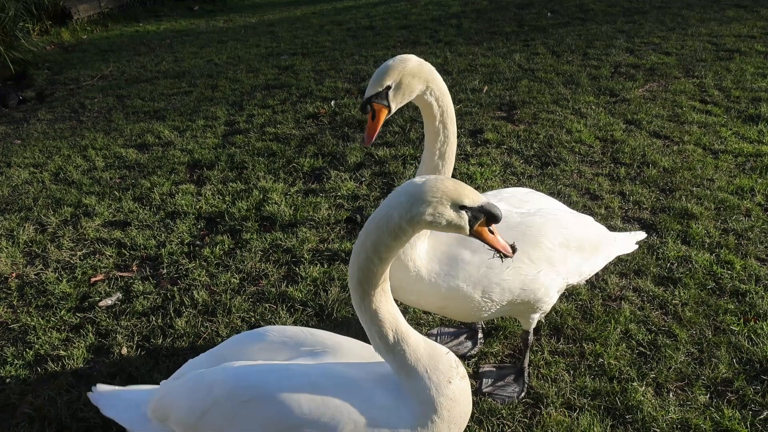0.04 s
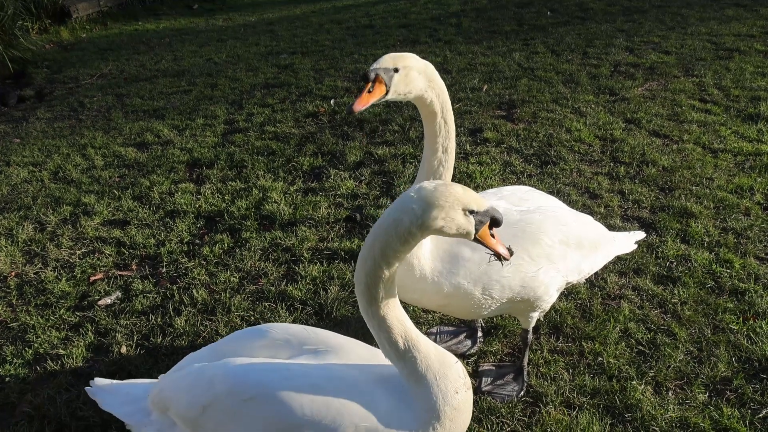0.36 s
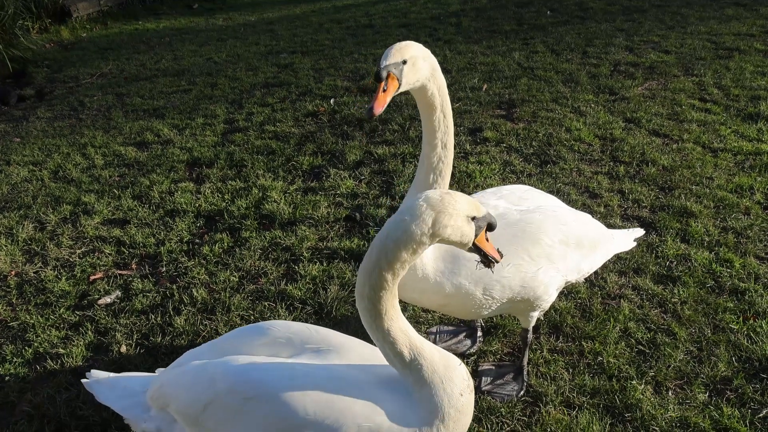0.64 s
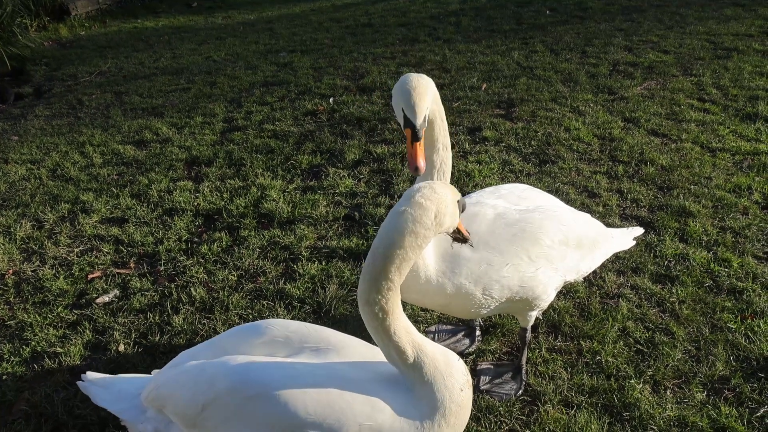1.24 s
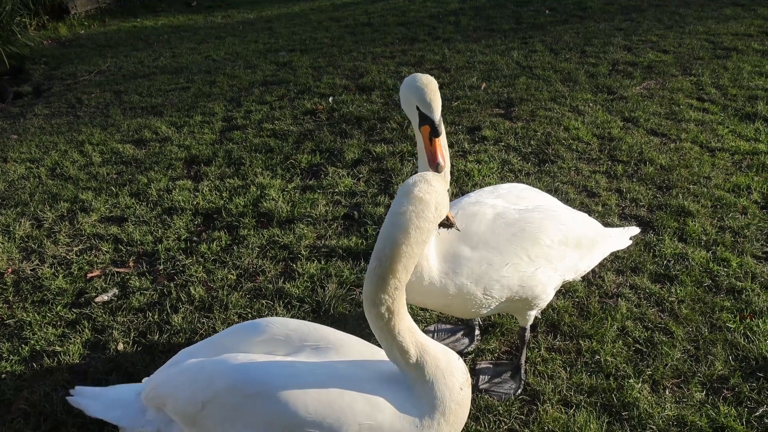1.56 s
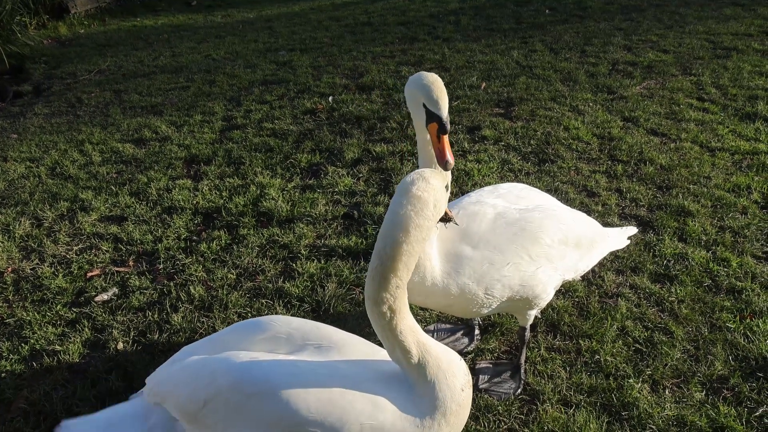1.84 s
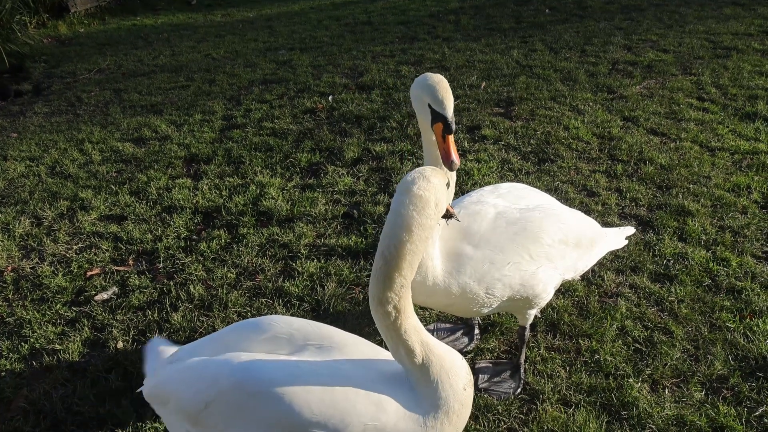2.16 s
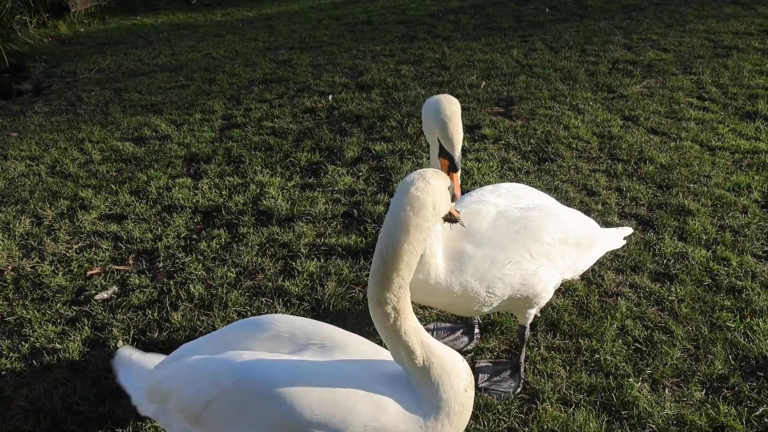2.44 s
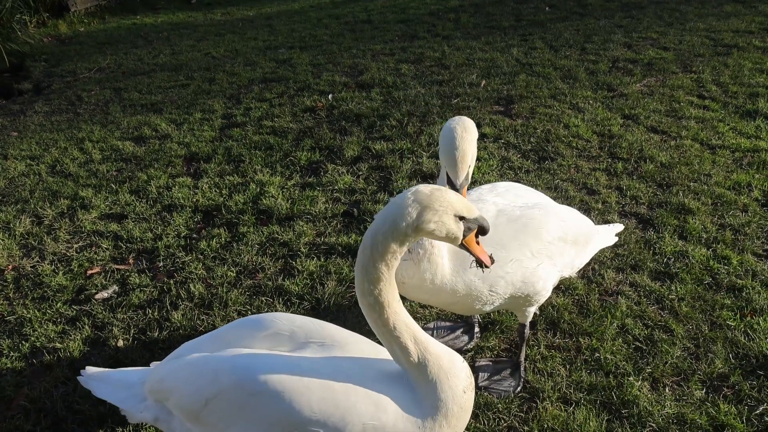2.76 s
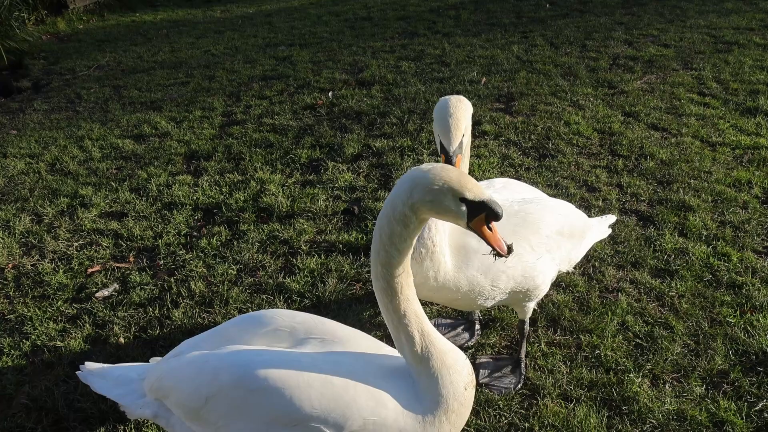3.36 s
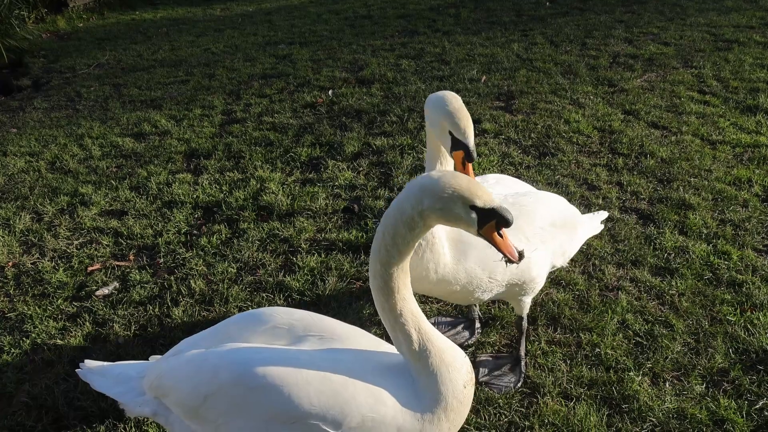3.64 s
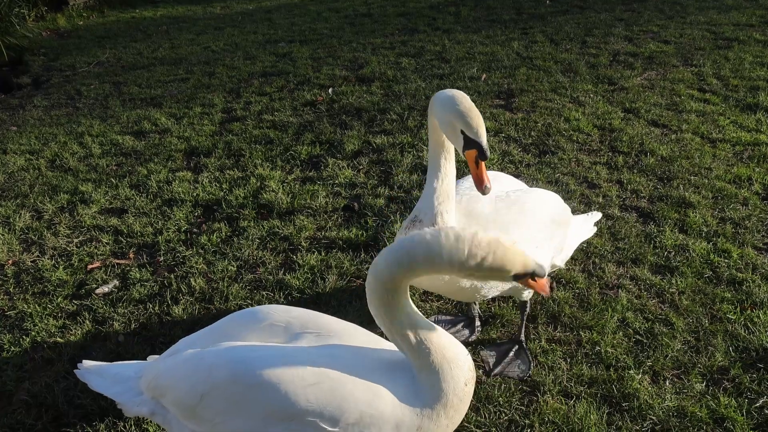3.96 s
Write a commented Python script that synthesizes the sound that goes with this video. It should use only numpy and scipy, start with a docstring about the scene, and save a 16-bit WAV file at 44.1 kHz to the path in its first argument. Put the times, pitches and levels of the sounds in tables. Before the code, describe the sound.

A swan hisses close by at 0.2 seconds, gives a sharp double snort near 0.4, and hisses again at 0.6, with a fine wet nostril rattle. Five rough, high whistles, each rising and falling, come between 1.2 and 1.9 seconds. Faint breaths follow, with soft peeps around 3.2 to 3.6. Small ticks dot the grass. Distant traffic rumbles throughout, and light wind bumps the microphone, mostly after 2 seconds.

```python
"""On a lawn, two swans close to the microphone. One forces air through its bill in a hiss, snorts twice
with slaps of the throat, hisses again with a fine wet rattle in the nostrils, then gives five rough,
arching whistles from both sides of the syrinx. Fainter peeps follow; bills and feet tick in the grass.
Traffic rumbles in the distance and a light wind bumps the microphone."""
import sys
import numpy as np
from scipy import signal
from scipy.fft import rfft, irfft
from scipy.io import wavfile
from scipy.ndimage import uniform_filter1d

SR = 44100
rng = np.random.default_rng(int(sys.argv[2]) if len(sys.argv) > 2 else 0)


def dump(signal):
    """Clip the signal to [-1, 1] and save it as 16-bit WAV at the path in sys.argv[1]."""
    limited = np.clip(np.atleast_2d(signal).T, -1, 1)
    pcm = np.round(limited * 32767).astype(np.int16)
    wavfile.write(sys.argv[1], SR, pcm)


N = 176400

# The pitch arch of every whistle: length_share, top_pitch_share
PITCH_ARCH = [(0, .53), (.08, .72), (.22, .79), (.34, .92), (.5, 1), (.66, .98), (.81, .8), (1, .53)]
# Whistles close to the microphone: start_s, length_s, top_pitch_hz, level_db, overtones_db, roughness
WHISTLE_CALLS = [(1.212, 0.075, 2610, -37.5, -9, 0.53), (1.327, 0.12, 2885, -31, -8, .55),
                 (1.479, 0.12, 2970, -26.5, -17, 0.54), (1.649, .115, 2960, -30.5, -15, 0.56),
                 (1.807, 0.12, 2762, -30.5, -16, 0.62)]


def whistles(attack_s=0.013, release_s=0.015, fade_db=9.5, stutter_hz=72, stutter_db=8):
    """Each call stutters as it climbs and fades as it falls; the two sides of the syrinx beat together."""
    second_ratio, second_db = 1.07, -1.5   # the other side of the syrinx, a little higher
    out = np.zeros(N)
    for start, length, top_hz, db, overtones_db, roughness in WHISTLE_CALLS:
        t = seconds(length)
        progress = t / length
        arch = np.interp(progress, *np.transpose(PITCH_ARCH))
        pitch = top_hz * uniform_filter1d(arch, size=400, mode="nearest")
        climb_left = np.maximum(1 - 2 * progress, 0)
        fallen = np.maximum(2 * progress - 1, 0)
        gate = np.minimum(t / attack_s, 1) * np.minimum((length - t) / release_s, 1)
        stutter = climb_left * np.cos(2 * np.pi * stutter_hz * t)
        level = gate * from_db(db - fade_db * fallen - stutter_db * stutter)
        rasp = roughness * (1 + 1.32 * np.sin(np.pi * climb_left))   # rougher on the way up
        second_level = from_db(second_db) * np.sin(np.pi * progress)
        second_side = second_level * syrinx(second_ratio * pitch, overtones_db, rasp)
        add(out, start, level * (syrinx(pitch, overtones_db, rasp) + second_side))
    return out


# How the throat colours whistles and squeaks: frequency_hz, gain_db
THROAT_COLOUR = [(1400, 36), (1750, 2.5), (2100, -7), (2550, -4.5), (2950, -2), (3500, -9.5), (4700, 2),
                 (5600, -2.5), (7000, -9.5), (9000, -14.5), (12000, -28)]


def syrinx(pitch, overtones_db, roughness, rasp_hz=220, rasp_width_hz=265, overtone_step_db=-6.5):
    """A tone and three overtones, wavering slowly and shaken in pitch and level by a fast rasp."""
    size = len(pitch)
    shake, throb = (band_noise(rasp_hz, rasp_width_hz, size=8192)[:size] for _ in range(2))
    waver = band_noise(hz=45, width_hz=45, size=8192)[:size]
    shaken_pitch = pitch * (1 + 0.039 * roughness * shake + 0.009 * waver)
    phase = 2 * np.pi * np.cumsum(shaken_pitch) / SR
    tone = 0
    for k in range(1, 5):
        db = 0 if k == 1 else overtones_db + overtone_step_db * (k - 2)
        tone = tone + from_db(db + at_hz(THROAT_COLOUR, k * pitch)) * np.sin(k * phase)
    return np.sqrt(2) * tone * rms_one(1 + 0.29 * roughness * throb)


# Close squeaks and fainter peeps: start_s, length_s, pitch_hz, level_db, overtones_db
SQUEAK_NOTES = [(1.188, 0.0048, 2370, -28, -11), (1.202, 0.0068, 2320, -20.5, -15),
                (1.215, 0.0114, 2316, -25, -11), (1.225, 0.013, 2340, -28, -13),
                (1.33, 0.011, 1950, -33, -10), (1.437, 0.0072, 1726, -35, -15),
                (1.651, .009, 1970, -33, -18), (1.918, .016, 1784, -33.5, -13),
                (3.242, .04, 2200, -39.5, -13.5), (3.482, 0.033, 3820, -39.5, -12),
                (3.519, 0.021, 3890, -36, -28), (3.533, 0.033, 4000, -42, -25),
                (3.533, 0.053, 2950, -39.5, -22)]


def squeaks():
    """Very short notes of the syrinx: a stutter into the whistles, catches at their edges, later peeps."""
    out = np.zeros(N)
    for start, length, hz, db, overtones_db in SQUEAK_NOTES:
        arch = np.sin(np.pi * seconds(length) / length)
        pitch = hz * (0.88 + 0.117 * arch)
        add(out, start, from_db(db) * arch * syrinx(pitch, overtones_db, roughness=0.6))
    return out


# Resonances of the bill: centre_hz, width_hz
BILL_MODES = [(2350, 430), (3520, 480), (4950, 500), (7650, 320), (10100, 4000), (12100, 4700)]
# Hisses at close range: start_s, length_s, level_db, swell_db, release_s, then gain_db per bill resonance
HISS_BREATHS = [(.19, .163, -34.5, 17, .015, 1.5, 1, -21, -8.5, -13, -19),
                (.399, .036, -43, 1, .055, 2, 0, -6, -25, -2, -17),
                (.611, .172, -42, 9, .04, -9, 3, -3.5, -26, -6, -8),
                (.85, .45, -56.5, 0, .15, -15, 0, -20, -12, -10, -25),
                (1.295, .085, -47, 6, .03, -8, 0, 0, -3, -14, -25),
                (1.60, .085, -48, 2, .03, -6, 2, -3, -12, -25, -30),
                (2.65, .61, -56, 0, .08, -22, 5, -16, -25, -20, -25),
                (3.885, .12, -52.5, 10, .03, -4, 0, -2, -6, 0, -1)]


def hisses(attack_s=0.015, flutter_db=2, rush_db=-8):
    """Air forced through the bill swells or holds, then dies away; each hiss favours other resonances."""
    out = np.zeros(N)
    for start, length, db, swell_db, release, *gains_db in HISS_BREATHS:
        t = seconds(length + 2 * release)
        bill = sum(from_db(gain_db) * band_noise(hz, width_hz, size=65536)
                   for (hz, width_hz), gain_db in zip(BILL_MODES, gains_db))
        rush = from_db(rush_db) * band_noise(hz=4600, width_hz=6000, size=65536)
        air = rms_one(bill + rush)[:len(t)]
        flutter = band_noise(hz=43, width_hz=64, size=65536)[:len(t)]
        swell_left = (1 - np.minimum(t / length, 1)) ** 2
        fade_db = 20 * np.maximum(t - length, 0) / release
        level = from_db(db - swell_db * swell_left - fade_db + flutter_db * flutter)
        add(out, start, air * np.minimum(t / attack_s, 1) * level)
    return butterworth(out, order=3, hz=12700)


# Resonances of the snorting throat: centre_hz, width_hz, gain_db
THROAT_MODES = [(650, 270, -13), (1070, 130, -0.5), (1640, 480, 8.5), (2214, 100, -0.5), (2970, 210, -7),
                (3750, 400, -30.5)]
# Snorts at close range: start_s, level_db, slaps_per_s
SNORT_RUNS = [(0.3609, -14.5, 756), (0.3848, -14, 690)]


def snorts(slap_count=4):
    """Two very short runs of soft slaps ring the throat, each slap stronger than the last."""
    slaps = np.zeros(N)
    for start, db, rate in SNORT_RUNS:
        for k in range(slap_count):
            slap_s = start + (k + rng.normal(0, 0.04)) / rate
            add(slaps, slap_s, from_db([db - 12.5 + 0.84 * k]))
    return butterworth(ring(slaps, THROAT_MODES), order=4, hz=3500)


# Low grunts under the hisses: start_s, length_s, level_db, pitch_hz
NECK_GRUNTS = [(.34, .12, -43, 270), (.73, .11, -39, 310)]


def grunts():
    """The long neck resonates softly at the end of the two strong hisses."""
    out = np.zeros(N)
    for start, length, db, hz in NECK_GRUNTS:
        t = seconds(length)
        neck = band_noise(hz, width_hz=81, size=16384)[:len(t)]
        add(out, start, from_db(db) * np.sin(np.pi * t / length) * neck)
    return out


# Resonances of the wet nostrils: centre_hz, width_hz, gain_db
NOSTRIL_MODES = [(10000, 430, 2), (7800, 540, -1), (11600, 900, -8)]
# Fine rattles, heard up close: start_s, end_s, level_db, clicks_per_s
NOSTRIL_RATTLES = [(.42, .495, -41, 63), (0.825, 1.422, -48, 52)]


def nostril_rattle(fade_db=5):
    """Thin, nearly regular wet clicks that weaken as the air runs out."""
    clicks = np.zeros(N)
    for start, end, db, rate in NOSTRIL_RATTLES:
        for click_s in np.arange(start, end, 1 / rate):
            click_db = db - fade_db * (click_s - start) / (end - start)
            add(clicks, click_s + rng.normal(0, 0.00033), from_db([click_db + rng.normal(0, 2.0)]))
    return butterworth(ring(clicks, NOSTRIL_MODES), order=3, hz=(8800, 11800), kind="bandpass")


# Small ticks in the nearby grass: start_s, level_db, pitch_hz, decay_s
GRASS_TICKS = [(0.124, -46, 8700, 0.0025), (0.132, -49, 5150, 0.0042), (0.764, -33.5, 1630, 0.0076),
               (.808, -32, 3050, 0.0054), (.892, -60, 5500, .012), (1.619, -32.5, 3040, 0.0027),
               (1.773, -42.5, 4540, 0.0073), (2.358, -49.5, 7860, .004), (2.911, -39.5, 4020, .004),
               (2.925, -53, 7500, 0.0036), (2.944, -58, 7000, 0.011), (3.128, -39, 3650, 0.0045),
               (3.58, -38.5, 4420, 0.0029), (3.581, -50, 11000, .002), (3.683, -55, 9000, .004),
               (3.785, -53, 9000, 0.0036), (3.782, -37, 3160, 0.0077)]


def grass_ticks(attack_s=0.0007, crack_db=-14):
    """Bills and feet touch the grass: brief dying rustles, each with a pitch and a broad crack."""
    out, t = np.zeros(N), seconds(0.046)
    for start, db, hz, decay in GRASS_TICKS:
        rustle = band_noise(hz, width_hz=0.27 * hz, size=len(t))
        crack = from_db(crack_db) * band_noise(hz=4700, width_hz=7300, size=len(t))
        envelope = np.minimum(t / attack_s, 1) * np.exp(-t / decay)
        add(out, start, from_db(db) * envelope * (rustle + crack))
    return out


# Wind on the microphone: centre_s, level_db, pitch_hz
WIND_BUMPS = [(.735, -18.5, 38), (2.171, -17, 60), (2.317, -16.5, 61), (2.629, -14.5, 47),
              (2.674, -14, 57.7), (2.867, -18.5, 41.7), (3.302, -12.5, 55), (3.463, -16, 45.2),
              (3.616, -11.5, 48.7)]


def wind_bumps(half_width_cycles=0.4):
    """Light wind bumps the microphone, one low push and pull at a time."""
    out, t = np.zeros(N), np.arange(N) / SR
    for centre, db, hz in WIND_BUMPS:
        cycles = (t - centre) * hz
        out -= from_db(db) * np.sin(2 * np.pi * cycles) * np.exp(-(cycles / half_width_cycles) ** 2)
    return out


# Spectrum of far traffic and wind: frequency_hz, relative_db
RUMBLE_SPECTRUM = [(12, -19), (20, 0.5), (49, -1.5), (68, -5.5), (95, -14), (126, -9), (144, -17),
                   (180, -15), (225, -19), (274, -18), (315, -20.5), (372, -24.5), (439, -26), (478, -26),
                   (549, -25.5), (597, -24.5), (767, -26), (1130, -26.5), (2400, -41.5), (2920, -42.5),
                   (3260, -42.5), (3750, -44.5), (5690, -58), (10200, -61.5), (15500, -64)]
# Narrow hums in the background: centre_hz, width_hz, level_db
BACKGROUND_HUMS = [(275, 19.4, -46.5), (174, 25.6, -45.5), (482, 12, -54.5)]


def distant_traffic(rumble_db=-28.5, whine_hz=4334, whine_db=-63.5):
    """A steady rumble of far traffic and wind, with three narrow hums and a faint whine."""
    t, f = np.arange(N) / SR, np.fft.rfftfreq(N, 1 / SR)
    spectrum = from_db(at_hz(RUMBLE_SPECTRUM, f)) * np.minimum(f / 20, 1) ** 2
    rumble = from_db(rumble_db) * shaped_noise(spectrum, N)
    hums = sum(from_db(db) * band_noise(hz, width_hz, N) for hz, width_hz, db in BACKGROUND_HUMS)
    whine = from_db(whine_db) * np.sin(2 * np.pi * whine_hz * t)
    return rumble + hums + whine


def from_db(db):
    """Decibels to gain."""
    return 10 ** (np.asarray(db) / 20)


def rms_one(x):
    """Scale to unit power."""
    return x / np.sqrt(np.mean(x ** 2) + 1e-20)


def at_hz(points, hz):
    """Read a spectrum's decibels on a log-frequency axis."""
    f, db = np.transpose(points)
    return np.interp(np.log(np.maximum(hz, 1)), np.log(f), db)


def add(out, start_s, x):
    """Mix x in at a time."""
    i = max(int(start_s * SR), 0)
    out[i:i + len(x)] += x[:max(N - i, 0)]


def seconds(length):
    """A time axis."""
    return np.arange(int(length * SR)) / SR


def butterworth(x, order, hz, kind="lowpass"):
    """Filter with a flat passband."""
    return signal.sosfilt(signal.butter(order, hz, kind, fs=SR, output="sos"), x)


def shaped_noise(spectrum, size):
    """Unit-power noise with the given spectrum."""
    return rms_one(irfft(rfft(rng.standard_normal(size)) * spectrum, size))


def band_noise(hz, width_hz, size):
    """Unit-power noise in one resonance."""
    f = np.fft.rfftfreq(size, 1 / SR)
    return shaped_noise(1 / (1 + 2 * ((f - hz) / width_hz) ** 2), size)


def ring(clicks, modes):
    """Clicks set decaying modes ringing."""
    out = 0
    for hz, width_hz, db in modes:
        radius, angle = np.exp(-np.pi * width_hz / SR), 2 * np.pi * hz / SR
        feedback = [1, -2 * radius * np.cos(angle), radius ** 2]
        out = out + from_db(db) * signal.lfilter([0, np.sin(angle)], feedback, clicks + 1e-18)
    return out


# Echoes reaching the microphone from the ground and surroundings: delay_s, gain_db
LAWN_ECHOES = [(.0043, -16), (.019, -15), (.047, -24)]


def scene():
    """The close swans and their faint, dull echoes over traffic and wind, all in the centre."""
    swans = whistles() + squeaks() + hisses() + grunts() + snorts() + nostril_rattle() + grass_ticks()
    out = swans + wind_bumps() + distant_traffic()
    dulled = butterworth(swans, order=1, hz=5000)
    for delay, db in LAWN_ECHOES:
        add(out, delay, from_db(db) * dulled)
    return np.array([out, out])


def record(dry):
    """The highest treble is cut steeply."""
    cutoff_hz = 15750
    return signal.sosfilt(signal.ellip(10, 0.1, 80, cutoff_hz, fs=SR, output="sos"), dry)


dry = scene()
out = record(dry)
dump(out)
```